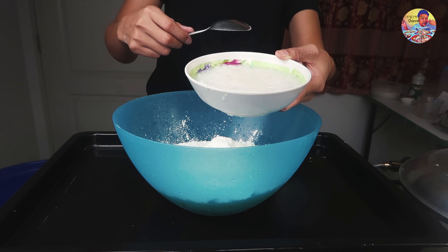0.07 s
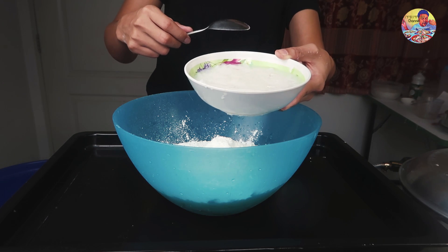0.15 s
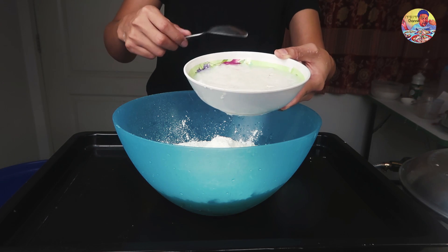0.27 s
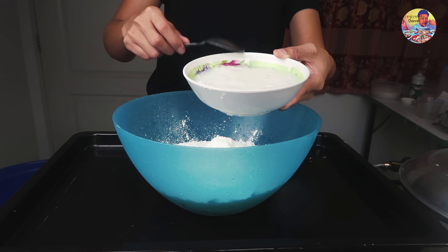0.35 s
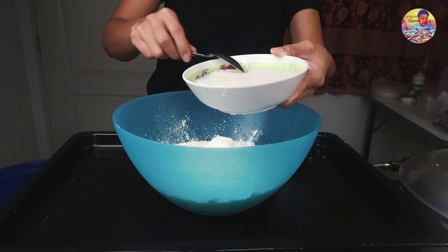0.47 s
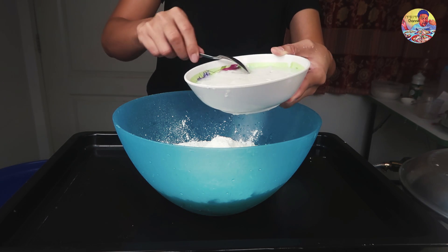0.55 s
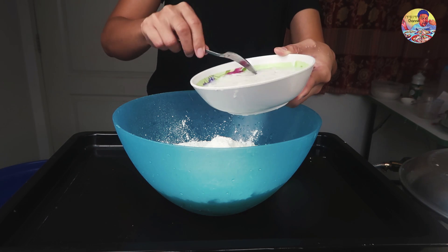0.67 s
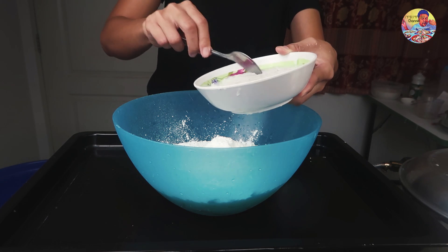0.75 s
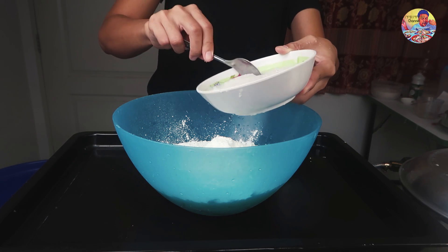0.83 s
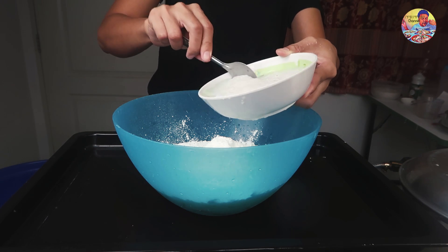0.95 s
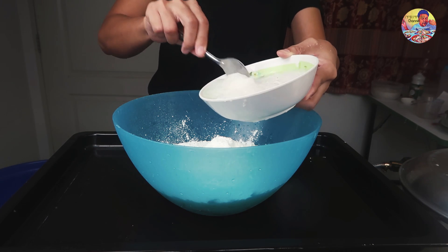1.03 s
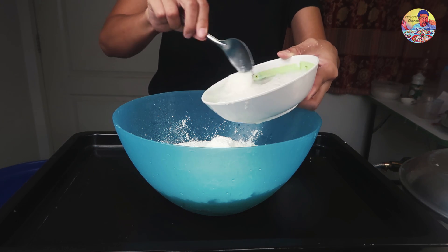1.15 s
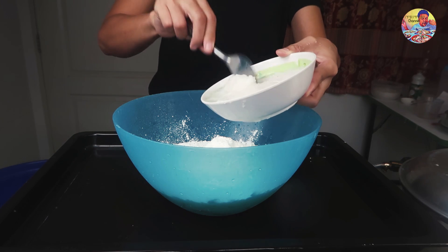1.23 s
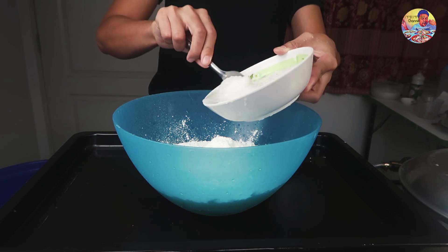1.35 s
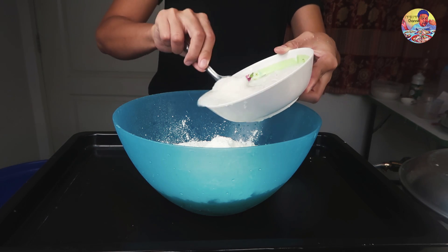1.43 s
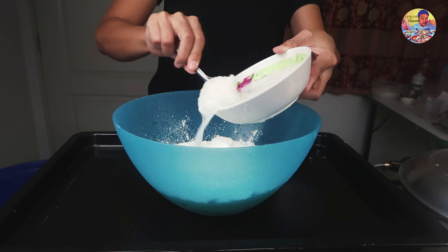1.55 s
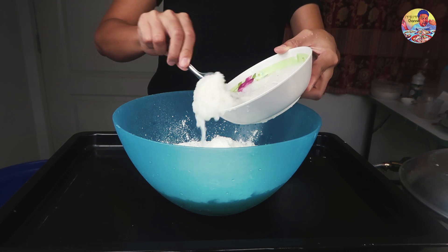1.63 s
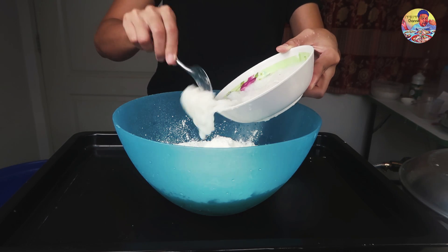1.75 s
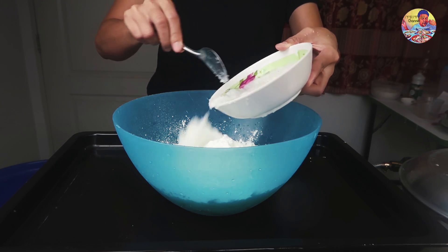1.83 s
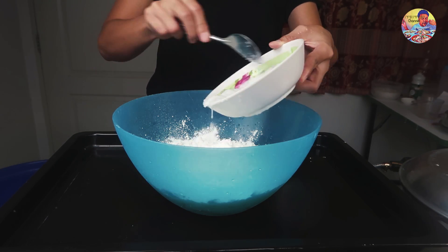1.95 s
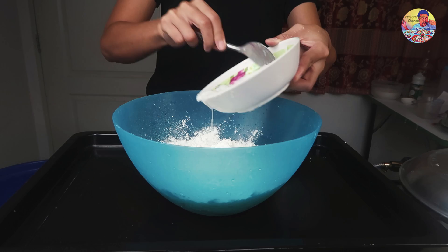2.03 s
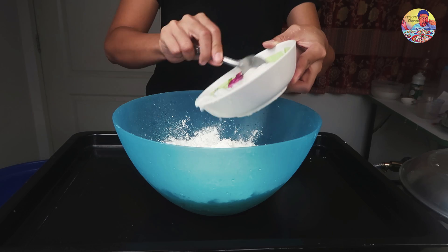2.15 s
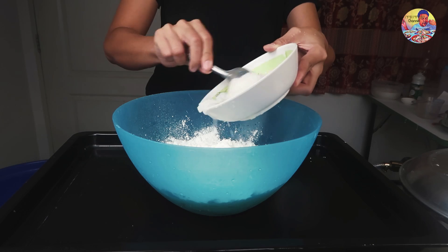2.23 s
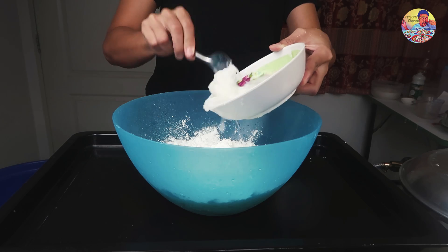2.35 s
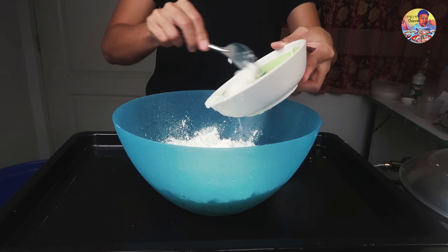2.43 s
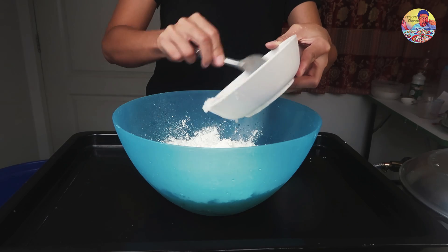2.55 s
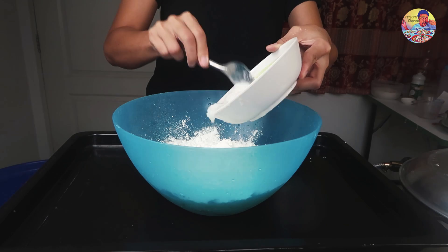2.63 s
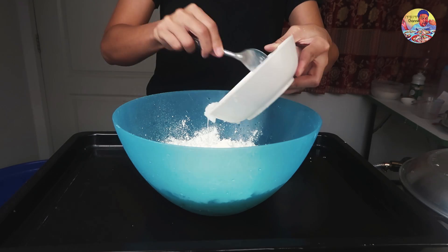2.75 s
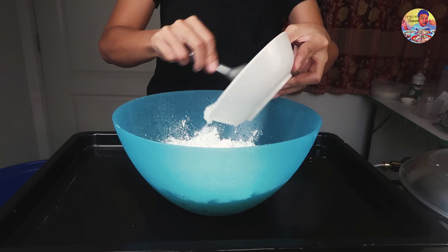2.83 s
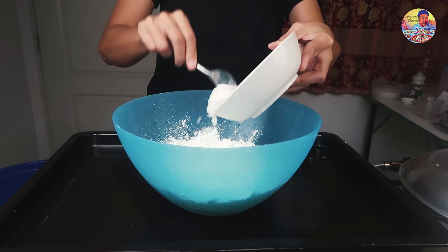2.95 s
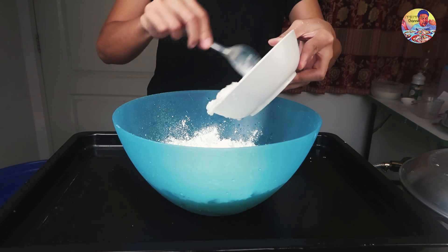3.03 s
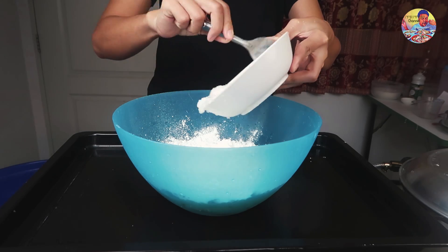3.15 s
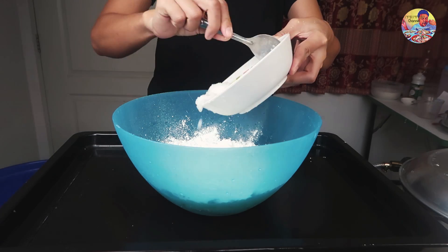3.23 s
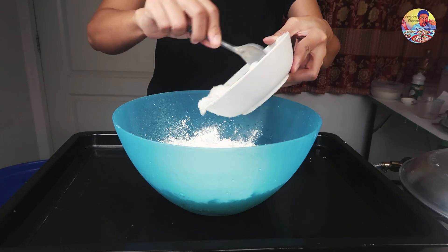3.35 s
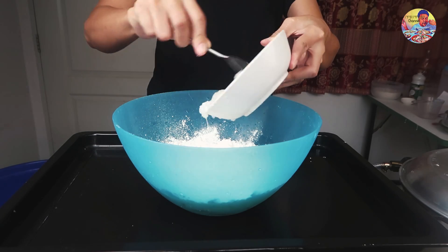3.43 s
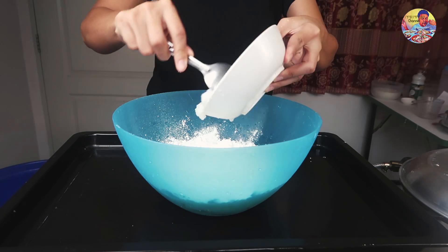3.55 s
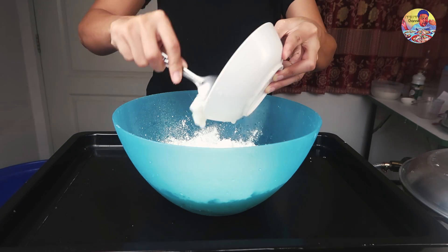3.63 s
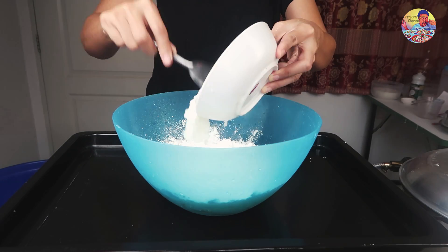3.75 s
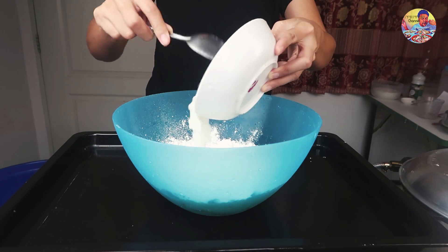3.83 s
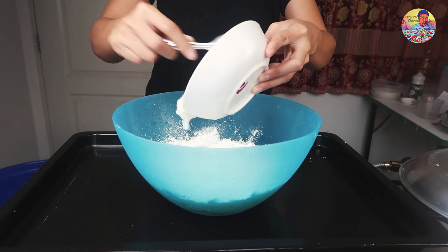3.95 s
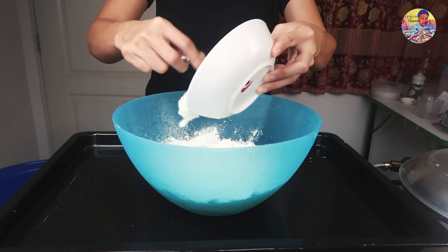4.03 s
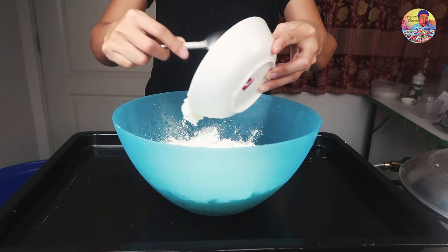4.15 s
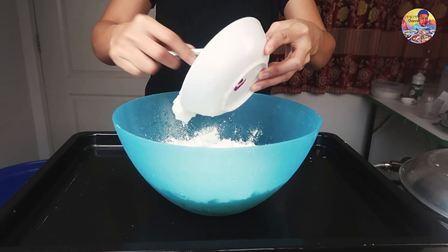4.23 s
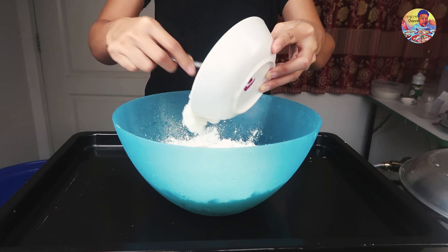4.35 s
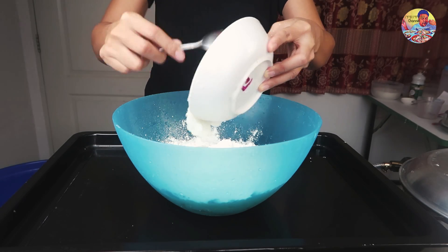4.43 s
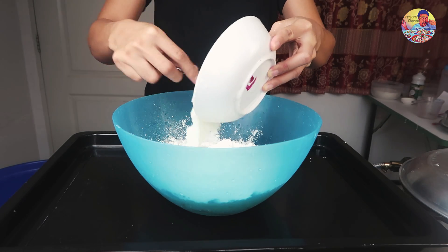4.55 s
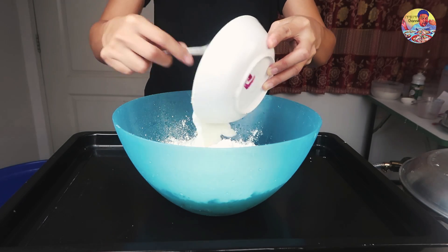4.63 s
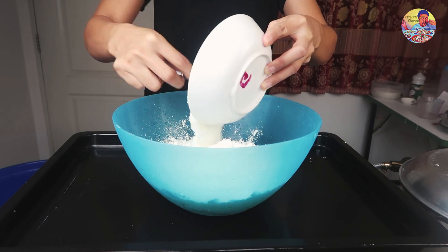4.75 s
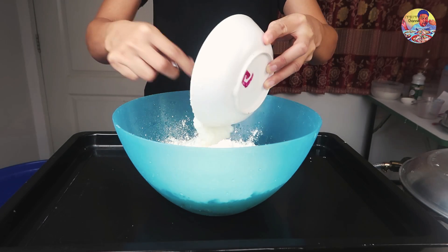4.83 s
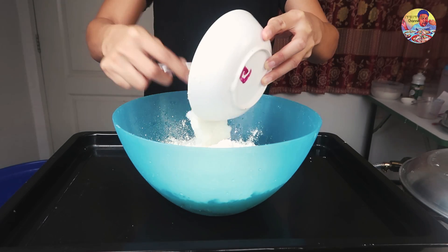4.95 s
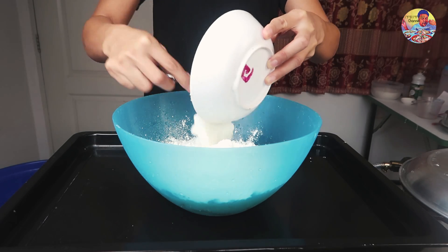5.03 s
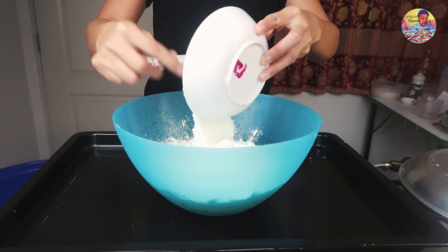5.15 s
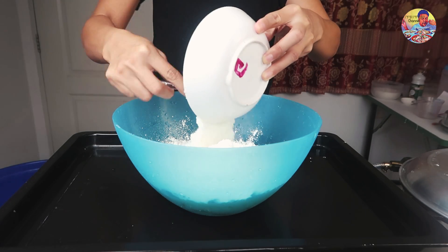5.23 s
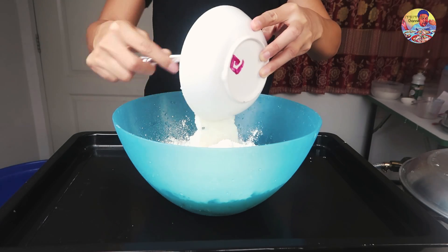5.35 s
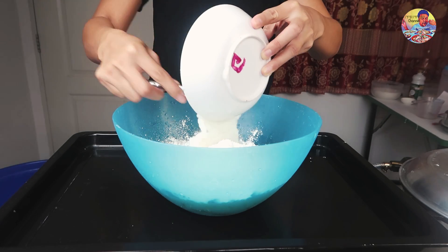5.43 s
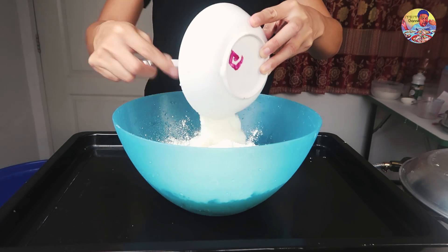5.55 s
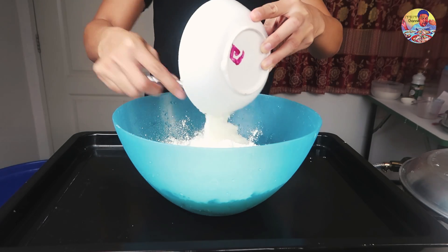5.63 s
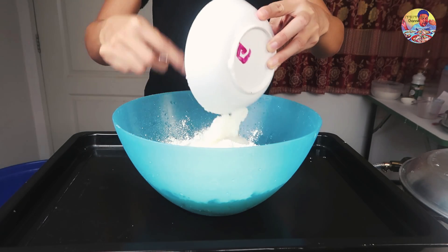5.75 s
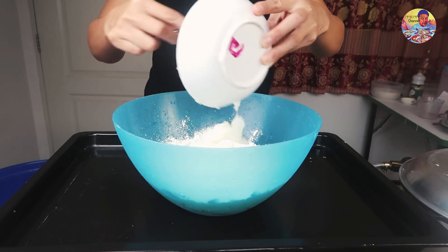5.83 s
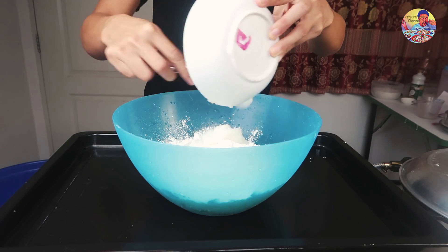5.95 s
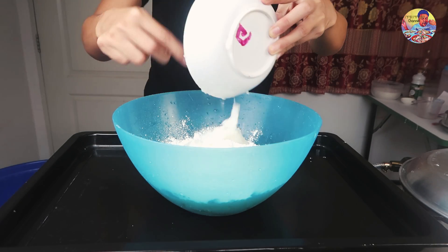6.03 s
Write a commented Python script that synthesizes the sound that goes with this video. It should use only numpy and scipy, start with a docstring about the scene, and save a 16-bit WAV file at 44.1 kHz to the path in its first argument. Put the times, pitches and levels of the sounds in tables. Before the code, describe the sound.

Close up in a hard-walled kitchen, a steel spoon clicks lightly on a ceramic bowl, then goes quiet. Paste lands in a plastic basin with a dull double plop near two seconds. Knocks and gritty scrapes follow, becoming frequent, bright and louder after four seconds. The thick contents damp the ringing; short bright echoes follow each blow over low room air and appliance hum.

```python
"""A steel spoon knocks and scrapes in a hand-held ceramic bowl: short mode rings, and clicks off the glaze.
Thick paste damps the bowl; lumps of it drop into a plastic basin and set its few modes sounding.
A hard-walled kitchen answers every blow with dense noise echoes, over room air and humming appliances.
A mid-side pair stands by: the mid capsule takes the bowl directly, the side capsule favours its treble."""
import sys
import numpy as np
from scipy import signal
from scipy.fft import rfft, irfft
from scipy.io import wavfile

SR = 44100
rng = np.random.default_rng(int(sys.argv[2]) if len(sys.argv) > 2 else 0)


def to_wav(s):
    """Save 16-bit WAV."""
    ch = np.atleast_2d(s).T  # columns
    pcm = np.round(np.clip(ch, -1, 1) * 32767)  # PCM
    wavfile.write(sys.argv[1], SR, pcm.astype(np.int16))


N = 268298

# spoon blows on the bowl, with favoured pitch and relative level of the mode families, low to high:
# t/s, f1/Hz, level1/dB, f2/Hz, level2/dB, f3/Hz, level3/dB, f4/Hz, level4/dB, top level/dB,
# freedom to ring (0 to 1)
BLOWS = [(0.527, 730, -56, 1844, -35, 2550, -22, 3166, -20, -25.5, 0.52),
         (1.4014, 984, -12.5, 1716, -15.5, 1913, -2.5, 3380, -15.5, -23.5, 0.7),
         (2.191, 846, -24, 1500, -10.5, 1970, -29, 4170, -11, -23.5, 0.86),
         (2.62, 777, -22, 1746, -12.5, 1740, -13.5, 2740, -25, -19, 0.96),
         (2.651, 807, -23, 1552, -13, 2103, -15.5, 3000, -15, -26, 0.99),
         (2.881, 830, -19, 1426, -8, 2367, -18, 4070, -17.5, -13, 0.88),
         (2.914, 790, -16, 1740, -13.5, 2144, -10.5, 3550, -12, -16, 0.72),
         (3.254, 816, -25.5, 1715, -33, 2250, -23.5, 4043, -29.5, -33.5, 1),
         (3.4, 783, -38, 1805, -29, 2645, -25.5, 2710, -37, -37.5, 0.93),
         (4.0, 653, -14, 1815, -12, 1818, -11, 3020, -24, -18, 1),
         (4.332, 780, -12.5, 1568, -9, 2000, -15.5, 3092, -9, -10.5, 0.67),
         (4.565, 727, -27.5, 1572, -19.5, 2133, -33, 3270, -25, -18.5, 0.93),
         (4.586, 750, -41, 1470, -27.5, 1790, -26.5, 3225, -29, -33, 0.9),
         (4.793, 562, -2.5, 1605, -13.5, 2146, -17, 3776, -21.5, -16, 0.92),
         (5.02, 710, -12.5, 1540, -15.5, 2260, -18, 3220, -8, -14.5, 0.82),
         (5.244, 982, -2.5, 1740, -12.5, 2027, -9, 3087, -9.5, -18, 0.85),
         (5.466, 767, -20, 1675, -7, 2149, -4.5, 2870, -16, -19, 0.8),
         (5.557, 806, -32, 1830, -30, 2140, -46, 3300, -24.5, -39, 0.7),
         (5.696, 1030, -4.5, 1575, -10, 2270, -4.5, 2854, -10.5, -15.5, 0.67),
         (5.754, 984, -8, 1520, -44, 1997, -22.5, 3370, -15, -19.5, 0.94),
         (5.973, 773, -16, 1740, -18.5, 2250, -22, 3290, -23.5, -14.5, 0.81)]
# the bowl's modes: f/Hz, relative level/dB, nominal t60/s (each kind of contact scales it)
BOWL_MODES = [(457, -64, 0.014), (663.8, -25, 0.011), (726, -1.5, 0.048), (1005, -11.5, 0.08),
              (1352.4, -82, 0.0104), (1326, -14.5, 0.18), (1500, 4.5, 0.042), (1628, 3, 0.028),
              (1740, 1.5, 0.048), (1872, -1.5, 0.049), (2036, 6, 0.029), (2250, 1, 0.03), (2485, 6, 0.029),
              (2550, -1, 0.094), (2771, -1, 0.075), (2913, 10, 0.012), (3252, 3.5, 0.053),
              (3630, 3.5, 0.042), (3980, 2.5, 0.057), (4170, -2, 0.044), (4648, 2, 0.057),
              (5170, -3.5, 0.044), (5513, 0, 0.088), (6243, 4, 0.041), (7200, -5, 0.079),
              (7960, -0.5, 0.044), (9160, -8.5, 0.072), (11400, -8.5, 0.054), (13800, -7.5, 0.015),
              (16000, 7, 0.0064)]
# upper limits of the four lower mode families; the fifth lies above: f/Hz
FAMILY_LIMITS = [1200, 1830, 2620, 4400]


def from_db(db):
    """Gain of a level in dB."""
    return 10 ** (np.asarray(db) / 20)


def rms_one(x):
    """Scale to rms 1."""
    return x / np.sqrt(np.mean(x ** 2) + 1e-20)


def in_time(rows):
    """Read the columns of a curve in time, one value a sample."""
    s, *columns = np.transpose(rows)
    return [np.interp(np.arange(N) / SR, s, column) for column in columns]


def at_hz(points, hz):
    """Read a spectrum on a log-frequency axis."""
    point_hz, value = np.transpose(points)
    return np.interp(np.log(hz), np.log(point_hz), value)


def coloured(x, spectrum):
    """Lay a spectrum in dB over x."""
    hz = np.arange(len(x) // 2 + 1) * SR / len(x) + 1
    return irfft(rfft(x) * from_db(at_hz(spectrum, hz)), len(x))


def drift(rate):
    """Slow chance of spread 1: low-passed noise, drawn every 40 samples."""
    r = np.exp(-80 * np.pi * rate / SR)
    noise = rng.standard_normal(N // 40 + 2002)
    slow = signal.lfilter([1], [1, -2 * r, r * r], noise)[2000:]
    return np.interp(np.arange(N) / 40, np.arange(len(slow)), rms_one(slow))


def width_of(t60):
    """Bandwidth in Hz of a resonance that falls 60 dB in t60 seconds."""
    return np.log(1000) / np.pi / t60


def ring(clicks, hz, t60):
    """A resonance: a unit click sets a decaying sine of height 1 ringing."""
    r, w = from_db(-60 / (t60 * SR)), 2 * np.pi * hz / SR
    return signal.lfilter([0, np.sin(w)], [1, -2 * r * np.cos(w), r * r], clicks + 1e-18)


def glide(x, hz, width_hz):
    """A resonance whose pitch moves: shift down, low-pass, shift back."""
    turn = np.exp(2j * np.pi * np.cumsum(hz) / SR)
    r = np.exp(-np.pi * width_hz / SR)
    return np.imag(turn * signal.lfilter([1], [1, -r], x / turn))


def knocks():
    """All blows; the spoon also skips and touches the same spot again, in the colour of the blow before."""
    # skips: t/s, level below that blow/dB
    skips = [(0.532, -5.5), (0.535, 0), (0.5608, -8), (.574, -13), (1.461, -28.5), (3.486, -9), (3.716, -4),
             (4.043, -8), (4.161, -10), (4.649, -5.5), (5.298, -20)]
    top_hz = 5000      # favoured pitch of the top family, the same for every blow
    touches = [(row[0], 0, row[1:]) for row in BLOWS]
    for s, below_db in skips:
        blow_before = [row for row in BLOWS if row[0] < s][-1]
        touches.append((s, below_db, blow_before[1:]))
    out = np.zeros(N + 3200)
    for s, gain_db, (*low, top_db, freedom) in touches:
        start = int(s * SR)
        out[start:start + 3200] += blow(gain_db, *low, top_hz, top_db, freedom)
    return out[:N]


def blow(peak_db, *place):
    """One touch and two quick rebounds; paste detunes each family to put one mode on the favoured pitch."""
    scatter = 0.036      # chance shift of the two upper families' other modes, share of the pitch
    favoured_ring, struck_ring = 1.54, .65      # t60 factors: favoured low modes, all others
    crack_db, crack_t60_s = 2.5, 0.0086      # short extra ring from steel touching glaze
    contact_s = 0.00042      # time a touch takes to build up
    hz, level_db, t60 = np.transpose(BOWL_MODES)
    favoured_hz, family_db, freedom = np.array(place[:-1:2]), np.array(place[1::2]), place[-1]
    family = np.searchsorted(FAMILY_LIMITS, hz)
    for k, to_hz in enumerate(favoured_hz):
        own = hz[family == k]
        nearest = own[np.argmin(abs(own - to_hz))]
        hz = np.where(family == k, hz * to_hz / nearest, hz)

    # modes off the favoured pitch are weaker
    off = np.log2(hz / favoured_hz[family])
    most_db = np.where(family < 3, 11.0, 5.0)
    level_db = level_db + family_db[family] - np.minimum(6 * (off / 0.069) ** 2, most_db)

    # the favoured low modes escape the paste and ring on
    favoured = abs(off) < 1e-3
    sings = favoured & (family < 3)
    t60 = t60 * freedom ** 3 * np.where(sings, favoured_ring, struck_ring)
    t = np.arange(3000) / SR
    luck = rng.standard_normal((4, len(hz)))
    hz = hz * (1 + scatter * luck[3] * (family > 2) * ~favoured)

    decay = from_db(-60 * t / t60[:, None])
    crack = (family < 4)[:, None] * from_db(crack_db - 60 * t / crack_t60_s)
    rings = np.sin(2 * np.pi * hz[:, None] * t) * (decay + crack)
    rings = rings * np.sin(np.pi / 2 * np.minimum(t / contact_s, 1)) ** 2
    signs = (-1.) ** np.arange(len(hz))
    out = np.zeros(3200)
    # a freer bowl spaces the rebounds wider
    for j, (late_s, touch_db) in enumerate([(0, -4.5), (.0011, -21), (.0022, -23.5)]):
        strength = from_db(peak_db + touch_db + level_db + 1.5 * luck[j]) * signs
        start = int(late_s * freedom * SR)
        out[start:start + len(t)] += strength @ rings
    return out


def scrape():
    """The spoon's edge trips over the glaze: dense clicks into the bowl's modes and four gliding notes."""
    rubbed_ring = .6      # share of a mode's nominal t60 left under the spoon's edge
    wander = .02      # the sliding edge bends all modes, share of the pitch
    pressure, hz1, hz2, hz3, hz5, db1, db2, db4, db5 = pushes()
    blow_s = np.array(BLOWS)[:, 0]
    last = np.maximum(np.searchsorted(blow_s, np.arange(N) / SR) - 1, 0)
    hz4 = np.array(BLOWS)[last, 7]      # the fourth family keeps the pitch of the last blow

    # grain of the glaze: about 3500 clicks a second, of uneven size and either sign
    sizes = from_db(3.3 * np.minimum(rng.exponential(1, N), 5)) * rng.choice([-1, 1], N)
    clicks = rms_one(sizes * (rng.random(N) < 3500 / SR))
    grit = clicks * from_db(2.5 * drift(35)) * pressure * from_db(-27.5)

    bend = 1 + wander * drift(5)
    favoured_hz, family_db = [hz1, hz2, hz3, hz4, hz5], [db1, db2, 0, db4, db5]
    out = 0
    for hz, level_db, t60 in BOWL_MODES:
        share = share_db(hz, favoured_hz, family_db, octaves=0.029, most_db=11.5)
        drive = grit * from_db(level_db + share + 2.5 * drift(6))
        out = out + glide(drive, hz * bend, width_of(rubbed_ring * t60))

    # the sliding contact detunes the bowl, so its clearest notes wander
    notes = [(hz1, db1 - 3.0, 45), (hz2, db2, 55), (hz3, 0, 60), (hz5, db5 + 2.0, 220)]
    for hz, level_db, width_hz in notes:
        out = out + glide(grit * from_db(level_db + 3.0), hz, width_hz)
    return out


def pushes():
    """Each push rises, fades and lifts off; its colour holds, or slides over where the next push follows on."""
    # pushes along the glaze: t/s, rise/s, length/s, friction level/dB, fade/(dB/s), f2/Hz, f3/Hz, top f/Hz,
    # level1/dB, level2/dB, level4/dB and top level/dB against the third family, f1/Hz
    strokes = [(0.527, 0.0023, 0.07, -38, 96, 1610, 2280, 5570, -23, -10, 8, -4, 730),
               (0.99, 0.0082, 0.052, -67, 20, 1447, 2330, 4800, 12, 3, 13, -3, 800),
               (2.625, .003, 0.018, -35.5, 50, 1500, 1980, 5000, -5, 0, 2, 11, 780),
               (2.666, 0.0049, .14, -38.5, 230, 1540, 2050, 4570, 8.5, -21, 0, -26, 743),
               (2.886, .003, 0.018, -38, 50, 1460, 2260, 5200, 2, 2, -1, 6, 790),
               (2.922, 0.0022, 0.25, -34, 150, 1564, 2350, 4800, 5, 5, -29, -13, 790),
               (3.258, 0.0036, 0.19, -39.5, 50, 1720, 2260, 4620, 6, -12, -8, -4, 777),
               (3.40, 0.034, 0.14, -38.5, 35, 1500, 2590, 4700, -26, -10.5, 3, -15, 815),
               (3.52, 0.036, 0.17, -41.5, 40, 1500, 2560, 4300, -18, 3.5, -1.5, -11, 790),
               (3.65, 0.078, 0.15, -36.5, 87, 1570, 2260, 4820, -11, -13.5, 1.5, -3, 755),
               (4.007, 0.0034, 0.11, -32.5, 154, 1640, 2250, 5580, 9.5, -19, 12, 7.5, 637),
               (4.088, 0.071, 0.11, -29, 215, 1750, 2130, 4740, -15, -9, -3, -4, 1010),
               (4.338, .003, .14, -36, 156, 1745, 2180, 4700, 5, 3, -13, 5.5, 926),
               (4.587, 0.0024, 0.085, -38, 210, 1550, 2300, 4730, -4, -4, 10.5, 5.5, 880),
               (4.797, 0.0023, 0.085, -28, 180, 1567, 2215, 5050, -10, -2, 1, 2.5, 710),
               (4.85, 0.019, 0.099, -35.5, 380, 1410, 2200, 4760, -6, 3.5, 14.5, -7, 940),
               (5.028, 0.0021, 0.054, -38, 30, 1500, 2010, 5570, -8, -25, -19, 6, 747),
               (5.075, 0.012, 0.096, -29, 350, 1534, 1996, 5270, -10, -33, -18, -4.5, 905),
               (5.249, 0.0026, 0.18, -44.5, 130, 1606, 2110, 5530, 8.5, 8, -4, 9, 960),
               (5.479, 0.0024, 0.16, -45.5, 88, 1800, 2300, 5200, 12.5, -6, -14, 1.5, 1003),
               (5.76, .003, 0.22, -36, 280, 1560, 1980, 4800, 14, -14, 9, 11, 960),
               (5.977, 0.0018, 0.082, -33.5, 22, 1700, 2220, 5240, -2.5, 3, 2, -8, 1010),
               (6.039, 0.024, 0.039, -36, 5, 1740, 2005, 4900, -17, -37, 5.5, 10, 1050)]
    lift_s = 0.054      # the spoon leaves the glaze
    t = np.arange(N) / SR
    pressure, colours = 0, []
    next_starts = [row[0] for row in strokes[1:]] + [np.inf]
    for (s, rise_s, length_s, db, fade_db_s, *colour), next_s in zip(strokes, next_starts):
        rise = np.clip((t - s) / rise_s, 0, 1)
        lift = np.clip((s + length_s + lift_s - t) / lift_s, 0, 1)
        fade = from_db(db - fade_db_s * np.maximum(t - s - rise_s, 0))
        pressure = np.maximum(pressure, rise * lift ** 2 * fade)
        colours.append((s + rise_s, *colour))
        if s + length_s + lift_s < next_s:
            colours.append((s + length_s, *colour))
    hz2, hz3, hz5, db1, db2, db4, db5, hz1 = in_time(colours)
    return pressure, hz1, hz2, hz3, hz5, db1, db2, db4, db5


def share_db(hz, favoured_hz, family_db, octaves, most_db):
    """Spoon spot and paste decide which mode of a family speaks: the nearest to the favoured pitch."""
    family = np.searchsorted(FAMILY_LIMITS, hz)
    off = np.log2(hz / favoured_hz[family])
    return family_db[family] - np.minimum(6 * (off / octaves) ** 2, most_db)


def paste():
    """Lumps set the plastic basin sounding; a longer, softer contact drives its upper modes less."""
    # paste landing: t/s, level/dB, contact time/s
    plops = [(1.981, -16.5, 0.00012), (1.996, -18, .0002), (2.054, -23, 0.0029), (2.111, -17, 0.0034)]
    # the basin's modes: f/Hz, relative level/dB, t60/s
    basin = [(172, -1, 0.24), (330, -10, 0.026), (600, 11, 0.011), (895, 10.5, 0.0055), (1410, -17.5, .015),
             (3000, -9, 0.015)]
    force = np.zeros(N)
    for s, level_db, contact_s in plops:
        push = np.hanning(int(contact_s * SR) + 3)
        start = int(s * SR)
        force[start:start + len(push)] -= from_db(level_db) * push / push.sum()
    return sum(from_db(db - 20.0) * ring(force, hz, t60) for hz, db, t60 in basin)


def kitchen(x):
    """Dense echoes start after the nearest wall and die at each band's own pace, a tail for each capsule.
    The bowl moves between blows, so the echo pattern changes: three patterns take turns."""
    # decay of the room: f/Hz, t60/s
    kitchen_t60 = [(200, 0.057), (700, 0.5), (1500, 0.56), (3000, 0.33), (6000, 0.55), (12000, 0.21)]
    t = np.arange(SR // 2 + SR // 4) / SR
    edges = 100 * 2 ** np.arange(0, 7.6, .5)      # half-octave bands
    white = rng.standard_normal((2, 3, 2, len(t)))      # noise set, pattern, capsule, time
    tails = 0
    for k, (low, high) in enumerate(zip(edges, edges[1:])):
        sos = signal.butter(2, [low, high], "band", fs=SR, output="sos")
        band = signal.sosfilt(sos, white[k % 2])      # neighbouring bands use separate noise
        tails = tails + band * from_db(-60 * t / at_hz(kitchen_t60, np.sqrt(low * high)))
    tails = tails * np.clip((t - .004) / 0.0016, 0, 1) / np.sqrt(SR)

    pattern = np.searchsorted(np.array(BLOWS)[:, 0] * SR - 2, np.arange(N)) % 3
    wet = 0
    for k in range(3):
        part = (x * (pattern == k))[None]
        wet = wet + signal.fftconvolve(part, tails[k], axes=1)[:, :N]
    return wet


def background():
    """Room air is coloured noise in both capsules; appliance tones are narrow wavering noise in the mid."""
    # room air at the mid and at the side capsule: f/Hz, relative level per Hz/dB
    air_mid = [(15, -48), (25, -33), (53, -2.5), (126, -5.5), (421, -9.5), (495, -12), (1110, -16),
               (1270, -15.5), (2230, -22), (3170, -25), (3930, -27.5), (11500, -42.5), (15500, -62)]
    air_side = [(15, -69), (25, -42), (164, -15.5), (349, -10.5), (631, -17), (782, -17), (3090, -24),
                (4040, -26.5), (12200, -39), (15500, -45)]
    # appliance tones: f/Hz, width/Hz, level/dB before the level curve
    hum = [(48.5, 2.4, -62), (102.3, 2.2, -67.5), (174.4, 21, -68.5), (1289, 20, -68)]
    # level curve, sinking towards the end and partly recovering: t/s, level/dB
    level_curve = [(0, 4.5), (4.9, 4.5), (5.25, 1.5), (5.5, -3), (5.75, -4), (6.08, 0)]
    air_mid_db, air_side_db = -55.5, -62      # before the level curve
    mid, side = [rms_one(coloured(rng.standard_normal(N), air)) for air in (air_mid, air_side)]
    mid = mid * from_db(air_mid_db + 0.96 * drift(14.0))
    for hz, width_hz, level_db in hum:
        tone = ring(rng.standard_normal(N), hz, width_of(width_hz))      # t60 and width are reciprocal
        mid = mid + from_db(level_db) * rms_one(tone)
    return np.array([mid, side * from_db(air_side_db)]) * from_db(in_time(level_curve)[0])


def scene():
    """Mix the mid and side signals and turn them into left and right."""
    # what the side capsule makes of bowl, basin and echoes: f/Hz, level/dB
    side_capsule = [(300, -30.5), (1000, -23.5), (2000, -22), (2750, -22.5), (4000, -10.5), (6000, -4),
                    (9000, 6), (15000, 14)]
    small = signal.butter(2, 300, "high", fs=SR, output="sos")      # a small bowl sends out little bass
    near = signal.sosfilt(small, knocks() + scrape()) + paste()
    wet_mid, wet_side = kitchen(near)
    # a 5 ms burst of decaying noise spreads the direct sound in the side signal
    spread = rng.standard_normal(220) * from_db(-60 * np.arange(220) / SR / 0.022)
    mid = near + from_db(9.0) * wet_mid
    side = from_db(-20.0) * signal.lfilter(spread, [1], near) + from_db(13.5) * wet_side
    mid, side = np.array([mid, coloured(side, side_capsule)]) + background()
    return np.array([mid + side, mid - side])


def record(dry):
    """The loudest peaks are rounded and the top is cut above 16.3 kHz."""
    rounded = dry / (1 + np.abs(dry / 1.05) ** 6) ** (1 / 6)
    return signal.sosfilt(signal.cheby2(12, 70, 16300, fs=SR, output="sos"), rounded)


dry = scene()
out = record(dry)
to_wav(out)
```